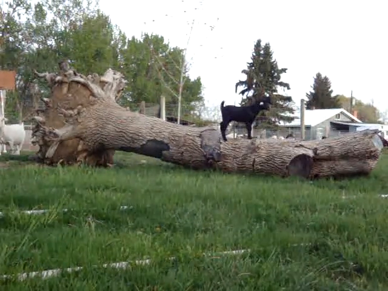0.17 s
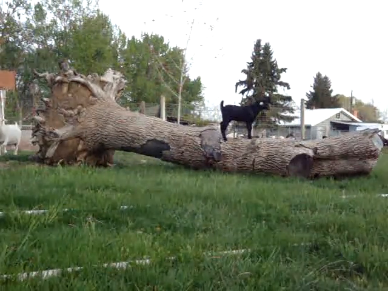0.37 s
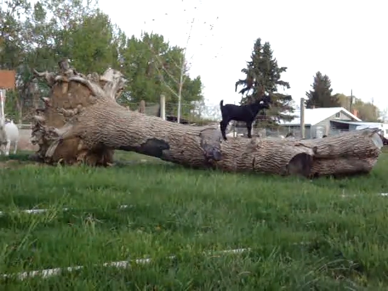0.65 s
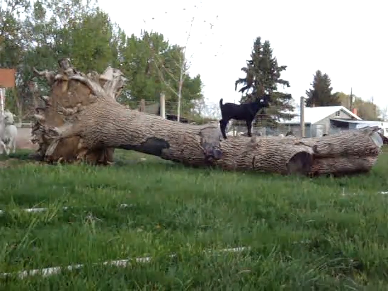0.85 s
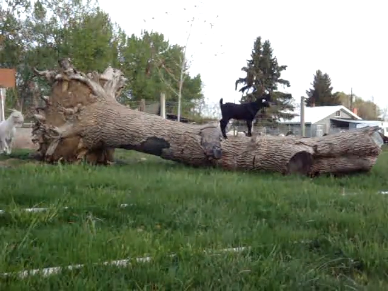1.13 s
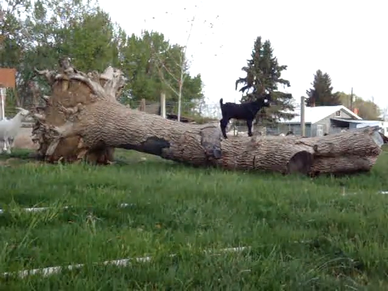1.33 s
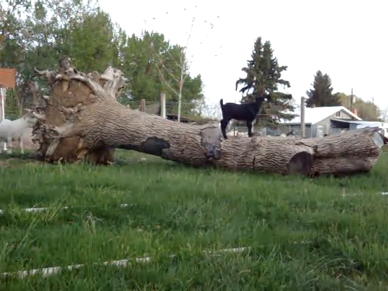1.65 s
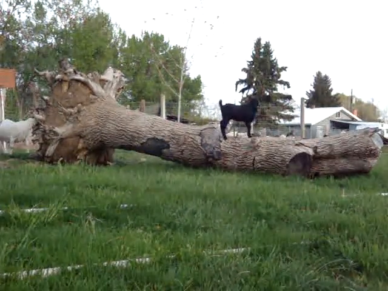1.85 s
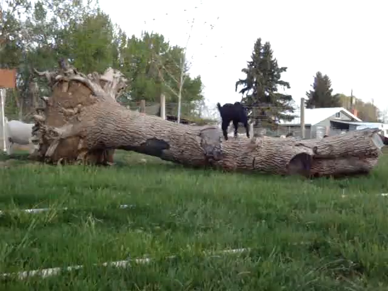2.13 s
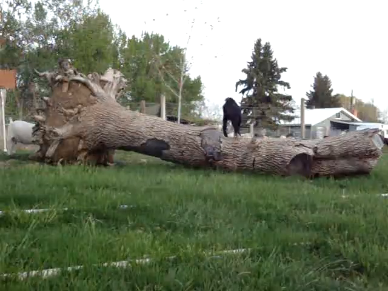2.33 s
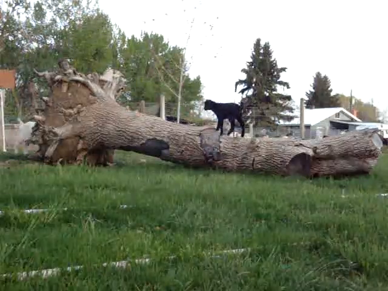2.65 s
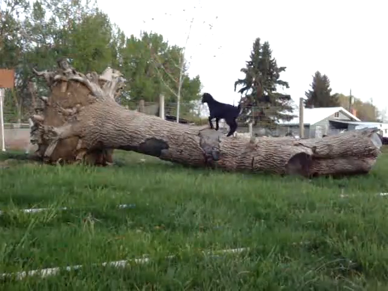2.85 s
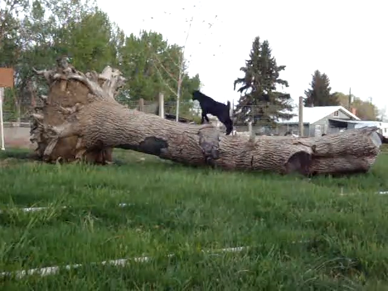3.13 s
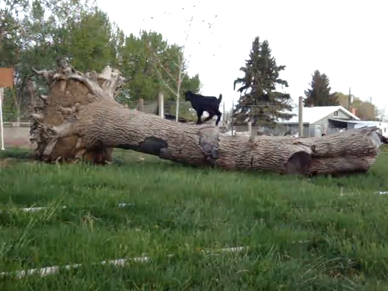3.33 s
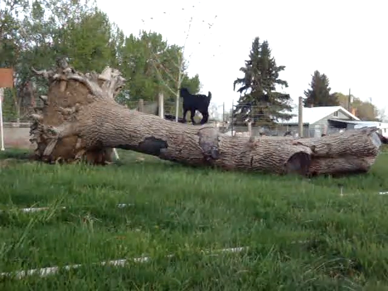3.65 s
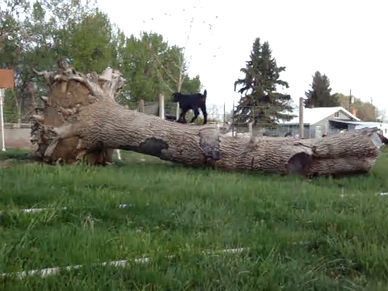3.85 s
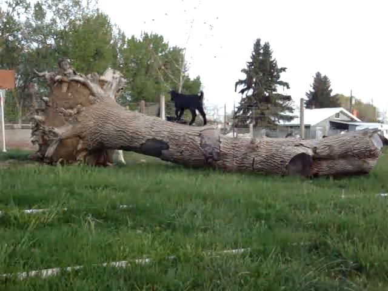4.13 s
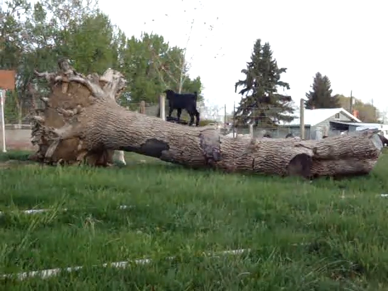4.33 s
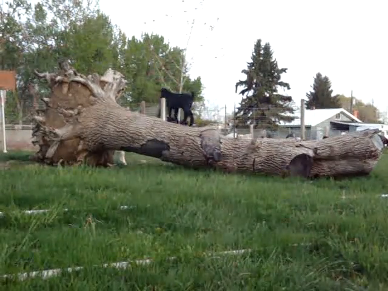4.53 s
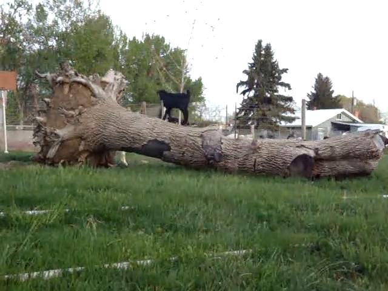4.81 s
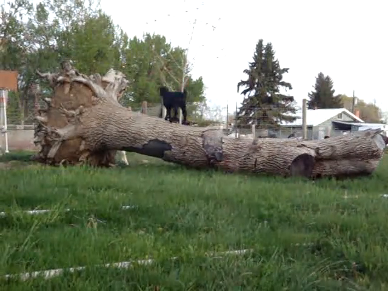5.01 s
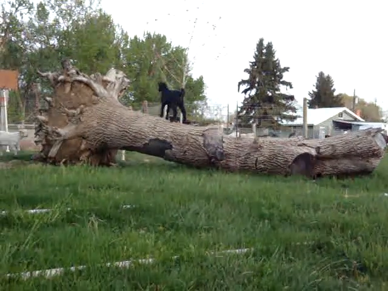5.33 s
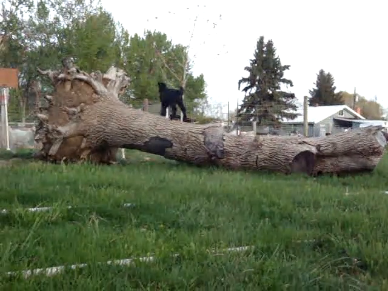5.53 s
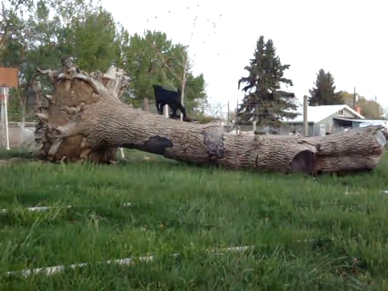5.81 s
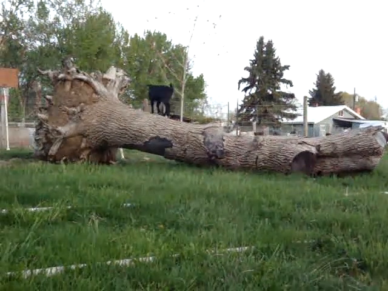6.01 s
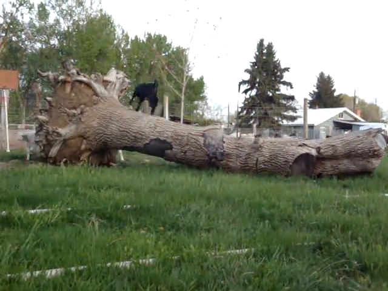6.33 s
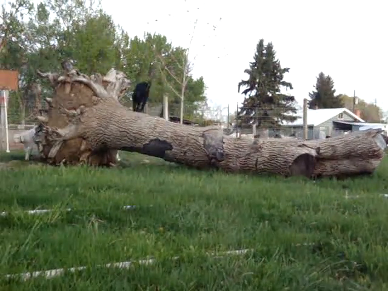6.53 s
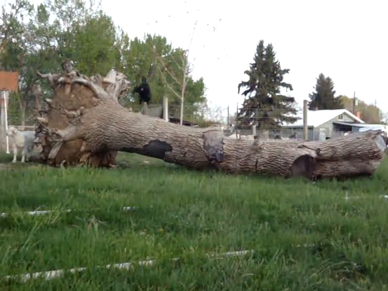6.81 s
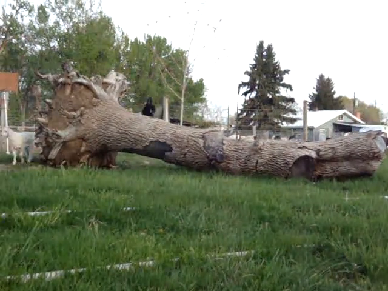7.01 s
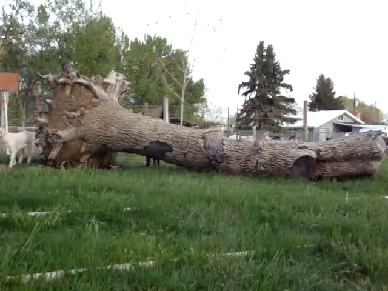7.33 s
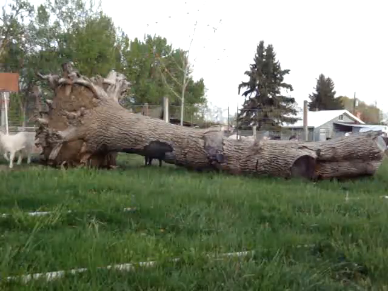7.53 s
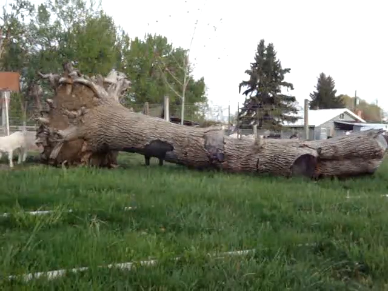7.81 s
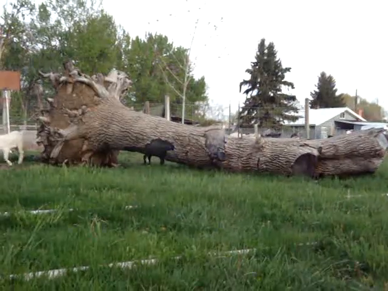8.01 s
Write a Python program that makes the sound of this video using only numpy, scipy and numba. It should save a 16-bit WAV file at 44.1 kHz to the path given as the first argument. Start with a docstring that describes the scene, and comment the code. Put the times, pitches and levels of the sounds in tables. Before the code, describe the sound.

Young goats call in throbbing, nasal bleats across an open lawn, with faint echo from barns. Three main calls fall in the first half, with a weak one and a deeper one between and beneath them. Dry wooden hoof taps come midway and late, then a brief breathy nostril flutter. Sparrows chirrup near and far, and muffled traffic hums steadily with passing cars; light hiss and dulled treble.

```python
"""A distant road roars from the start, with cars passing and sparrows chirping near and far; goat kids
bleat in throbs on a farm lawn, hooves tap on a log and one goat snorts. Noise bands make the road, gliding
sines the birds, vocal-fold pulses through tract modes the bleats, and flapping nostrils the snort.
Barns echo the calls and taps, a brief faint tone and a short low note sound, and a small microphone hisses."""
import sys
import numpy as np
from scipy import signal
from scipy.io import wavfile
from scipy.ndimage import uniform_filter1d
from numba import njit

SR = 44100
rng = np.random.default_rng(int(sys.argv[2]) if len(sys.argv) > 2 else 0)


def master(y):
    """Save y as 16-bit WAV."""
    cut = np.clip(np.atleast_2d(y).T, -1, 1)
    pcm = np.round(cut * 32767)  # scale
    wavfile.write(sys.argv[1], SR, pcm.astype(np.int16))


N = 359856
TIME = np.arange(N) / SR

# Swell of the road: (time [s], relative level [dB])
ROAD_SWELL = [(0.0, -49.5), (0.48, -51.5), (8.16, -48)]
# Spectrum of road and farm rumble: (frequency [Hz], relative level per hertz [dB])
YARD_SPECTRUM = [(25, -39.5), (107, -7.5), (190, -8.5), (392, -12), (680, -4.5), (1010, 2), (1480, -2),
                 (2320, -9), (4220, -17.5), (5560, -20.5), (9890, -30)]
# Passing cars: (time of peak [s], half length to 1/e [s], centre [Hz], filter width [Hz], peak level [dB])
CARS = [(4.77, 0.26, 1920, 770, -44), (7.64, 0.61, 1350, 950, -45.5), (3.23, 0.47, 1230, 500, -50.5)]
RUMBLE_RISE_DB = 6.5  # a heavy engine swells far off

# Single whistles: (time [s], length [s], start pitch [Hz], end pitch [Hz], level [dB])
WHISTLES = [(0.027, 0.059, 2800, 2840, -51.5), (0.63, 0.037, 3600, 2850, -52),
            (0.814, 0.04, 2900, 3250, -52), (0.853, 0.039, 3500, 3150, -43),
            (0.877, 0.062, 2500, 3000, -48), (0.919, 0.054, 2720, 2740, -48.5),
            (1.145, 0.029, 3300, 3980, -57), (1.168, 0.05, 4000, 2890, -50.5),
            (1.273, 0.02, 3130, 2280, -52), (1.297, 0.034, 3200, 3300, -48),
            (1.432, 0.064, 3120, 2430, -48.5), (1.538, 0.04, 2350, 2450, -52),
            (1.737, 0.035, 3200, 2300, -52), (1.856, 0.068, 3380, 2880, -51.5),
            (1.971, 0.044, 3040, 2390, -51.5), (2.022, 0.059, 4820, 3660, -52),
            (2.065, 0.047, 3760, 3090, -45.5), (2.854, 0.011, 5900, 3900, -46),
            (3.174, 0.061, 3660, 3710, -48.5), (3.371, 0.06, 4800, 3500, -61),
            (3.426, 0.09, 3420, 3340, -51.5), (3.542, 0.067, 2910, 3050, -53),
            (4.336, 0.12, 2900, 2550, -53), (4.512, 0.049, 3400, 3300, -55), (4.75, 0.066, 2810, 2940, -52),
            (4.815, 0.04, 3000, 3800, -57), (4.923, 0.031, 5000, 3210, -57.5),
            (5.037, 0.047, 2900, 3900, -54.5), (5.236, 0.063, 2830, 3820, -51.5),
            (5.304, 0.077, 2600, 2750, -48), (5.33, 0.11, 3620, 3650, -49.5),
            (5.388, 0.053, 4100, 3050, -45.5), (5.621, 0.073, 3500, 3630, -48),
            (5.685, 0.12, 3620, 3410, -53.5), (5.767, 0.082, 2840, 2170, -50),
            (5.796, 0.096, 4350, 2600, -50), (5.918, 0.048, 4880, 3650, -56),
            (5.946, 0.11, 3400, 3570, -53), (6.263, 0.14, 3850, 3650, -53),
            (6.268, 0.12, 2650, 2670, -48.5), (6.431, 0.11, 2300, 2600, -55.5),
            (6.5, 0.11, 3200, 3500, -54.5), (6.589, 0.025, 4550, 3200, -42),
            (6.641, 0.014, 4200, 3200, -57), (6.646, 0.017, 2650, 3100, -45),
            (6.66, 0.022, 3100, 2300, -48), (6.694, 0.03, 2800, 3100, -54), (6.89, 0.068, 3000, 2200, -55),
            (6.95, 0.11, 2550, 2740, -49.5), (7.56, 0.039, 3210, 2340, -52), (7.62, 0.081, 7700, 4330, -61),
            (7.945, 0.11, 6800, 4300, -61), (8.019, 0.053, 2550, 2380, -51)]
# Whistles with a fluttering pitch: (time [s], length [s], start pitch [Hz], end pitch [Hz], level [dB])
FLUTTERS = [(0.83, 0.039, 3900, 3780, -46), (0.88, 0.043, 4200, 3530, -51),
            (3.681, 0.04, 4760, 3400, -38.5), (6.57, 0.03, 3900, 4430, -47),
            (6.613, 0.032, 3080, 4200, -50), (6.72, 0.078, 3450, 3320, -60),
            (6.807, 0.14, 3750, 3600, -53.5)]
# Strokes of a near sparrow's chirrup, before the pitch ratio: (time from start [s], pitch [Hz], level [dB])
CHIRRUP_STROKES = [
    [(0, 3800, -18.5), (.025, 3750, -5), (.04, 4960, 8.5), (.068, 5010, 7), (.075, 4670, 2),
     (.088, 2900, -7.5)],
    [(.082, 6600, -14), (.102, 4700, 0.5), (.118, 5620, -4), (.138, 7640, -29.5)],
    [(.12, 2800, -3), (.135, 3900, -12.5), (.15, 4800, 1.5), (.162, 3920, -9), (.178, 2650, -11)],
    [(.155, 7740, -23), (.165, 6100, -5.5), (.175, 4830, -24)],
]
# Rough upper partners of the chirrup: (pitch excess [share], relative level [dB])
SECOND_VOICE = [(0.108, -5), (0.199, -16)]
# Chirrups: (time [s], level [dB], pitch ratio [1])
CHIRRUPS = [(.58, -45.5, 0.99), (4.311, -47, 0.95), (6.126, -45.5, 0.96), (7.019, -45.5, 0.96)]
# A burry two-peaked call, before the pitch ratio: (time from start [s], pitch [Hz], level [dB])
CHURR_STROKE = [(0, 3500, -7), (0.02, 5140, 4.5), (.035, 4300, 1.5), (.05, 3500, 3), (0.065, 2974, -11.5),
                (.075, 3900, 6.5), (0.084, 4350, -6), (.096, 3830, 3.5), (.108, 2970, 1), (0.13, 2980, -14)]
# Burry calls: (time [s], level [dB], pitch ratio [1])
CHURRS = [(1.616, -44.5, 0.94), (5.438, -38.5, 0.94)]
ARCH = 0.0366  # the middle of a whistle rises this share above a straight glide
FLUTTER_HZ, FLUTTER_SHARE = 220, .065  # rate and pitch share of the flutter
BURR_HZ, BURR_DEPTH = 75, .85  # mean chopping rate and depth [share]
CHATTER_PER_S, CHATTER_FLOOR_DB = 90, -67  # rate and quietest whistle of the far flock

# A barn wall: (delay [s], level [dB])
ECHO = (.11, -20)
TAIL_DB, TAIL_T60_S = -14, .5  # energy beside the direct sound, time to fall 60 dB

# Throbs, one table a bleat:
# (time [s], pitch [Hz], level [dB], dip before it [dB], slack pitch before it [Hz])
BLEATS = [
    [(0.144, 488, -36, -31, 481.4), (0.174, 487.6, -33.5, -6, 477), (0.248, 482, -35, -4, 476.6),
     (0.327, 492.4, -32.5, -8, 476), (0.42, 487.3, -34, -13, 468.3), (0.51, 425, -37.5, -12, 413)],
    [(2.179, 510, -36, -7, 496.3), (2.243, 530.3, -32, -8.5, 500.5), (2.327, 536.3, -32, -10.5, 497),
     (2.411, 536.6, -29, -16, 499.2), (2.488, 535.7, -24.5, -11, 499.7), (2.576, 501, -30, -8.5, 483),
     (2.632, 451.6, -39, 1.5, 451), (2.654, 413, -40, -9, 435)],
    [(3.761, 518.5, -32, -38, 520.5), (3.837, 531.4, -26, -8, 502.5), (3.92, 535, -26.5, -8, 504.3),
     (3.999, 538, -25.5, -11.5, 498.3), (4.083, 532, -26.5, -10, 485), (4.171, 506.5, -30, -9.5, 469),
     (4.235, 409.5, -34.5, -7, 449)],
    [(3.02, 339.5, -46, -14, 323.3), (3.108, 350, -45.5, -13, 324), (3.19, 339, -46.5, -23, 323),
     (3.28, 353, -50.5, -8, 330)],
    [(3.6, 367, -48.5, -5, 360), (3.67, 393, -40, -10, 373.4), (3.748, 399, -36, -6.5, 367),
     (3.83, 392, -38.5, -5, 376), (3.915, 386, -36.5, -7, 361), (4.0, 376, -32.5, -12, 362)],
]
# One row a bleat: (mouth mode at start [Hz], at end [Hz], mouth level at start [dB], held [dB],
# at end [dB], brightness at start [dB], at end [dB])
CALLERS = [(1120, 1180, 11.5, 9.5, 23, 5.5, 0.5), (1074, 1280, 17, 3.5, 16.5, 3.5, 0),
           (940, 1207, 10.5, 0.5, 12.5, 4.5, -5), (970, 1100, 9, 2, 0, 2.5, 4),
           (804, 740, 10, 4, -7.5, -8, -6)]
# Tract length of each caller: (relative length [1])
TRACT_LENGTH = [1.019, 0.986, 1.04, 0.95, 1.053]
# Turbulence beside the tone of each caller: (level [dB])
BREATH_DB = [-15, -5, -7, -4, -7]
# Highest tract mode of each caller: (level [dB])
TOP_MODE_DB = [-6.5, -4.5, -3, -33, -17]
# Quick pitch jitter of each caller: (jitter [share])
WOBBLE = [.0015, .004, .003, .006, .006]
# Throat modes at tract length 1: (centre [Hz], filter width [Hz], level [dB])
THROAT_MODES = [(1790, 1200, -5.5), (3117, 680, 6.5)]
# Upper tract modes at length 1, mouth at rest: (centre [Hz], filter width [Hz], level [dB])
UPPER_MODES = [(4780, 900, 3.5), (5960, 530, 0.5)]
TOP_MODE_HZ, TOP_WIDTH_HZ = 7490, 2020  # centre at tract length 1
MOUTH_WIDTH_HZ = 308
SPREAD = .06  # folds close gradually: high overtones lag [radians per overtone squared]
RAGGED_DB = 2.5  # wavering of the high overtones
OPENING_S, CLOSING_S = 0.12, 0.061  # the mouth opens, then closes
HUMP_S, HUMP_LEAD_S = .016, 0.00314  # the pitch hump comes just before the level peaks
GAPE = .03  # a push raises the upper modes by this share
LOW_AIR_DB = -6  # little breath rings the low modes
DIP_SHARE, FADE_S = 0.32, 0.027  # place of a dip between two throbs [share], final fade

# A faint wavering tone: (fade-in time [s], fade-out time [s], the two overlapping, pitch [Hz],
# mean level [dB])
WHINE = (5, 4.5, 533.5, -67)
# A short low note: (time [s], length [s], start pitch [Hz], end pitch [Hz], level [dB])
LOW_NOTE = (2.068, .035, 360, 430, -58)

# Taps on the log: (time [s], peak level [dB])
HOOVES = [(2.9751, -38), (3.0968, -30.5), (3.478, -34.5), (6.6495, -33)]

# Flapping of the nostrils: (time [s], flap rate [Hz], relative level [dB])
SNORT = [(7.291, 110, -73), (7.307, 107, -43), (7.341, 109.4, -41.5), (7.364, 85, -45), (7.412, 74, -56)]
# Nose modes, before the 0.95 default scale of modes(): (centre [Hz], filter width [Hz], level [dB])
NOSE_MODES = [(110, 80, -1), (240, 31, 11.5), (345, 69, 14), (517, 310, -4)]
# Line along which the nose ring weakens beside the air: (time at full gain [s], time at a fifth [s])
NOSE_FADE = (7.36, 8)
SNORT_AIR_DB = 2.5

HISS_DB, TOP_HZ = -60, 9980  # hiss ahead of the treble cut, and the cutoff


def undb(db):
    """Decibels: amplitude grows tenfold for every 20 dB."""
    return 10 ** (np.asarray(db) / 20)


def unit(x):
    """Normalization: scale to root mean square 1."""
    return x / np.sqrt(np.mean(x ** 2))


@njit
def svf(x, hz, width):
    """Resonance: a state-variable band-pass with a moving centre, gain 1 at the centre."""
    y, band, low = np.empty(len(x)), 0., 0.
    for i in range(len(x)):
        g, k = np.tan(np.pi * hz[i] / SR), width / hz[i]
        v = (band + g * (x[i] - low)) / (1 + g * (g + k))
        band, low, y[i] = 2 * v - band, low + 2 * g * v, k * v
    return y


def steep(x, hz, width):
    """Cascaded resonance: applying it twice darkens the skirts."""
    hz = hz + np.zeros(len(x))
    return svf(svf(x, hz, 1. * width), hz, 1. * width)


def modes(x, table, scale=0.95):
    """Modal superposition: resonances sum with alternating sign."""
    total = 0
    for k, (hz, width, db) in enumerate(table):
        total = total + (-1) ** k * undb(db) * steep(x, hz * scale, width)
    return total


def walk(rate, size=N):
    """Random modulation: levels held 1 / rate s and slewed twice; spread near 1."""
    k = int(SR / rate)
    held = np.repeat(rng.standard_normal(size // k + 1), k)
    return 1.71 * uniform_filter1d(uniform_filter1d(held, k), k)[:size]


def add(out, t0, x):
    """Superposition: mix x into out from time t0."""
    i = int(t0 * SR)
    out[i:i + len(x)] += x[:len(out) - i]


def smooth(t, knots, values, ms=8):
    """Moving average: straight lines with rounded corners."""
    return uniform_filter1d(np.interp(t, knots, values), int(ms * SR / 1000), mode="nearest")


def yard():
    """Band-filtered noise: road and rumble flicker in third octaves; the roar swells, cars pass."""
    hz_table, db_table = np.transpose(YARD_SPECTRUM)
    swell_db = np.interp(TIME, *np.transpose(ROAD_SWELL))
    out = 0
    for hz in 31 * 2 ** np.arange(0, 8.4, 1 / 3):
        band = svf(rng.standard_normal(N), np.full(N, hz), hz / 4)
        band = svf(band, np.full(N, hz), hz / 3)
        # the swell is tyre roar, strongest near 1 kHz
        share = np.exp(-(np.log(hz / 1100) / 1.1) ** 2)
        db = np.interp(np.log(hz), np.log(hz_table), db_table)
        db = db + share * (swell_db - swell_db.mean()) + 1.82 * walk(7)
        engine_band = np.exp(-(np.log(hz / 70) / 0.97) ** 2)
        db += RUMBLE_RISE_DB * engine_band * np.exp(-((TIME - 7.3) / 1.7) ** 2)
        out = out + undb(db) * band
    out = unit(out) * undb(swell_db.mean() + 2.5)
    for s, half, hz, width, db in CARS:
        centre = np.full(N, 1. * hz)
        tyres = svf(svf(rng.standard_normal(N), centre, 1. * width), centre, 0.96 * width)
        out += unit(tyres) * undb(db) * np.exp(-((TIME - s) / half) ** 2)
    return out


def stroke(out, t0, rows, db, ratio, rough=.0, burr=.0, shake=.0):
    """Frequency and amplitude modulation: a syrinx sweeps a sine, roughened by chance, chopped by a burr."""
    s, hz, rel_db = np.transpose(rows)
    t = np.arange(s[0], s[-1], 1 / SR)
    edge = np.clip(np.minimum(t - s[0], s[-1] - t) / 0.00055, 0, 1)
    shaking = 1 + shake * np.sin(2 * np.pi * FLUTTER_HZ * t)
    pitch = ratio * smooth(t, s, hz, ms=9.2) * shaking
    tone = np.sin(2 * np.pi * np.cumsum(pitch) / SR)
    turns = np.cumsum(BURR_HZ * (1 + 0.29 * walk(65.0, size=len(t)))) / SR
    roughness = 1 + rough * walk(500, size=len(t))
    chopping = 1 - burr * np.cos(np.pi * turns) ** 4
    level = undb(db + np.interp(t, s, rel_db))
    add(out, t0 + s[0], np.sqrt(2) * tone * edge * roughness * chopping * level)


def whistle(out, t0, length, start_hz, end_hz, db, arch=ARCH, rough=.33, shake=.0):
    """Frequency glide: a short arched sweep swells and fades."""
    u = np.linspace(0, 1, 7)
    bow = (2 * u - 1) ** 2
    hz = (start_hz + (end_hz - start_hz) * u) * (1 + arch * (1 - bow))
    stroke(out, t0, np.c_[u * length, hz, -9.0 * bow], db, 1, rough=rough, shake=shake)


def birds():
    """Superposed syrinx tones: near calls, single whistles and a far flock's random chatter."""
    out = np.zeros(N)
    for t0, db, ratio in CHIRRUPS:
        for rows in CHIRRUP_STROKES:
            stroke(out, t0, rows, db, ratio, rough=0.37)
            for excess, rel_db in SECOND_VOICE:
                stroke(out, t0, rows, db + rel_db, ratio * (1 + excess), rough=0.91)
    for t0, db, ratio in CHURRS:
        stroke(out, t0, CHURR_STROKE, db, ratio, rough=.25, burr=BURR_DEPTH)
        # rough second voice
        stroke(out, t0, CHURR_STROKE, db - 4.0, ratio * 1.12, rough=0.56, burr=BURR_DEPTH)
    for row in WHISTLES:
        whistle(out, *row)
    for row in FLUTTERS:
        whistle(out, *row, shake=FLUTTER_SHARE)
    for when, long, pitch, rise, fall, loud in rng.random((int(CHATTER_PER_S * N / SR), 6)):
        hz = 2600 + 2200 * pitch
        start_hz, end_hz = hz * (1.1 - 0.3 * rise), hz * (.98 - 0.4 * fall)
        whistle(out, when * N / SR, .02 + .03 * long, start_hz, end_hz, CHATTER_FLOOR_DB + 8 * loud, arch=0.13)
    return out


def barns(x):
    """Reflection by convolution: one echo and a thin scattered tail that decays exponentially."""
    t = np.arange(0, .6, 1 / SR)
    response = rng.standard_normal(len(t)) * undb(-60 * t / TAIL_T60_S) * (t > .012)
    response *= undb(TAIL_DB) / np.sqrt(np.sum(response ** 2))
    response[0] = 1  # direct sound
    response[int(ECHO[0] * SR)] += undb(ECHO[1])
    return signal.fftconvolve(x, response)[:N]


def bleat(out, throbs, caller, length, breath_db, top_db, wobble):
    """Source and filter: fold pulses drive tract modes; each belly push shapes level and pitch."""
    s, hz, db, dip_db, slack_hz = np.transpose(throbs)
    mouth_start_hz, mouth_end_hz, start_db, held_db, end_db, bright_start_db, bright_end_db = caller
    gaps = np.diff(s, prepend=s[0] - .06)
    dips = s - (1 - DIP_SHARE) * gaps
    knots = np.r_[dips[0] - FADE_S / 2, np.ravel([dips, s], "F"), s[-1] + FADE_S]
    t = np.arange(knots[0], knots[-1], 1 / SR)
    done = np.clip((t - s[0]) / (s[-1] - s[0]), 0, 1)
    # each push is a short rounded hump over a flat floor
    ramps = np.interp(t, knots, np.r_[0, np.arange(2 * len(s)) % 2, .3])
    push = np.sin(np.pi / 2 * ramps) ** 3.1
    between = s - gaps / 2
    last_slack_hz = .97 * min(hz[-1], slack_hz[-1])
    slack = np.interp(t, np.r_[between, knots[-1]], np.r_[slack_hz, last_slack_hz])
    peaks = s - HUMP_LEAD_S
    lifts = hz - np.interp(peaks, t, slack)
    pitch = slack + lifts @ np.exp(-((t - peaks[:, None]) / HUMP_S) ** 2)
    size = undb(np.interp(t, dips, db + dip_db)) * (1 - push) + undb(np.interp(t, s, db)) * push
    size *= np.interp(t, knots[[0, 1, -2, -1]], [0, 1, 1, 0]) ** .5
    phase = 2 * np.pi * np.cumsum(pitch * (1 + wobble * walk(145.8, size=len(t)))) / SR
    # uneven folds: each overtone wavers in level, the high ones most
    pulses = np.zeros(len(t))
    for k in range(1, 31):
        waver = undb(RAGGED_DB * min(k / 10, 1) * walk(40.24, size=len(t)))
        weight = np.clip(k / 2, 0, 1) ** 3  # weakens the fundamental only
        pulses += np.sin(k * phase - SPREAD * k * k) * weight * waver
    pulses = -unit(pulses)
    air = unit(rng.standard_normal(len(t)) * (3.3 + np.cos(phase)))
    source = pulses + undb(breath_db) * air
    clear = pulses + undb(breath_db + LOW_AIR_DB) * air
    # the mouth mode has its own level at each end of the call and slides while the treble drifts
    opening = np.exp(-(np.maximum(t - s[0], 0) / OPENING_S) ** 2)
    closing = np.exp(-(np.maximum(s[-1] - t, 0) / CLOSING_S) ** 2)
    mouth_db = held_db + (start_db - held_db) * opening + (end_db - held_db) * closing
    mouth_hz = mouth_start_hz + (mouth_end_hz - mouth_start_hz) * done
    low = undb(mouth_db) * steep(clear, mouth_hz, MOUTH_WIDTH_HZ)
    throat = modes(clear, THROAT_MODES, 1 / length)
    upper = modes(source, UPPER_MODES, (1 + GAPE * push) / length)
    upper = upper + undb(top_db) * steep(source, TOP_MODE_HZ / length, TOP_WIDTH_HZ)
    brightness = undb(bright_start_db + (bright_end_db - bright_start_db) * done)
    voice = low - throat + brightness * upper
    loudness = np.sqrt(uniform_filter1d(voice ** 2, SR // 25))
    add(out, knots[0], voice / loudness * size)


def tones():
    """Sinusoidal oscillation: a brief faint tone that wavers, and one short low note."""
    fade_in, fade_out, hz, db = WHINE
    phase = 2 * np.pi * np.cumsum(hz * (1 + 0.0038 * walk(3))) / SR
    out = np.sqrt(2) * np.sin(phase) * undb(db + 2 * walk(3.1))
    out *= np.interp(TIME, [fade_in - .3, fade_in, fade_out, fade_out + .3], [0, 1, 1, 0])
    whistle(out, *LOW_NOTE, rough=.05)
    return out


def hooves():
    """Impact: decaying noise through a broad resonance gives dry taps on wood."""
    out, t = np.zeros(N), np.arange(0, .03, 1 / SR)
    for s, db in HOOVES:
        tap = steep(rng.standard_normal(len(t)) * np.exp(-t / 0.0088), 1540, 2600)
        add(out, s, undb(db) * tap / np.abs(tap).max())
    return out


def snort():
    """Flow-driven flapping: nostril pulses ring the nose and chop a jet of air."""
    s, hz, db = np.transpose(SNORT)
    t = np.arange(s[0], s[-1], 1 / SR)
    flap_hz = np.interp(t, s, hz) * (1 + 0.015 * walk(57, size=len(t)))
    cycle = np.cumsum(flap_hz) / SR % 1
    jet = steep(rng.standard_normal(len(t)), 3400, 7600)
    jet = jet * (0.1 + np.exp(-cycle / 0.41) * undb(3.1 * walk(80, size=len(t))))
    flaps = np.exp(-cycle / 0.026) * undb(4.8 * walk(97, size=len(t)))
    ring = -unit(modes(flaps, NOSE_MODES)) * np.interp(t, NOSE_FADE, [1, .2])
    sound = ring + undb(SNORT_AIR_DB) * unit(jet)
    out = np.zeros(N)
    add(out, s[0], sound * undb(np.interp(t, s, db)))
    return out


def scene():
    """Superposition of sources: calls in the open yard over the road."""
    goats = np.zeros(N)
    for call in zip(BLEATS, CALLERS, TRACT_LENGTH, BREATH_DB, TOP_MODE_DB, WOBBLE):
        bleat(goats, *call)
    echoed = barns(goats + birds() + hooves())
    return (echoed + snort() + tones() + yard())[None]


def record(dry):
    """Self-noise and band limiting: the microphone adds hiss and the top is cut."""
    wet = dry + undb(HISS_DB) * rng.standard_normal(dry.shape)
    return signal.sosfilt(signal.ellip(12, .2, 75, TOP_HZ, fs=SR, output="sos"), wet)


dry = scene()
out = record(dry)
master(out)
```